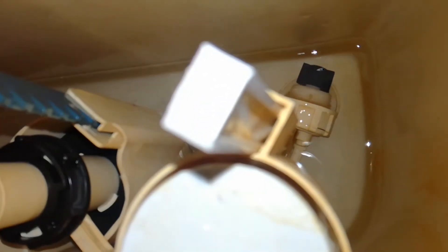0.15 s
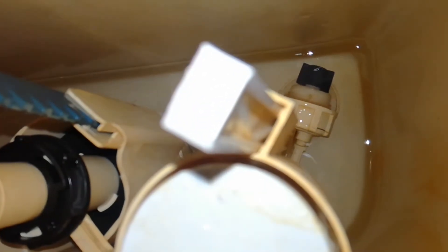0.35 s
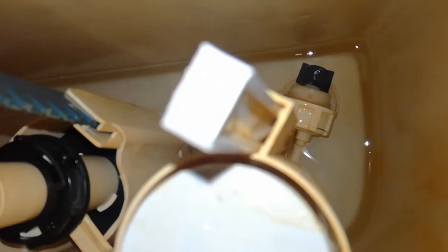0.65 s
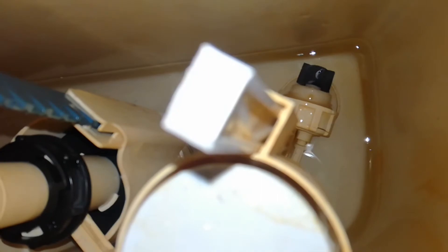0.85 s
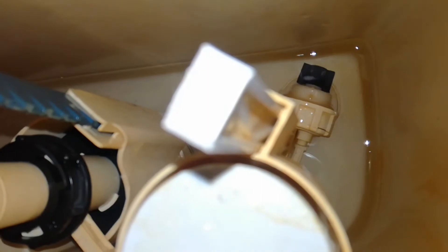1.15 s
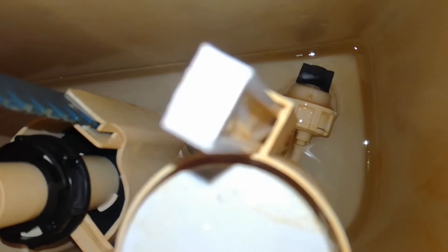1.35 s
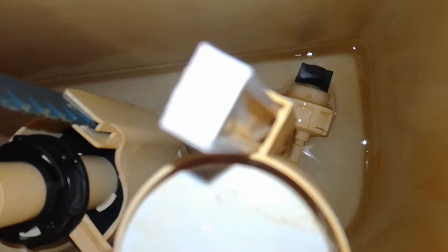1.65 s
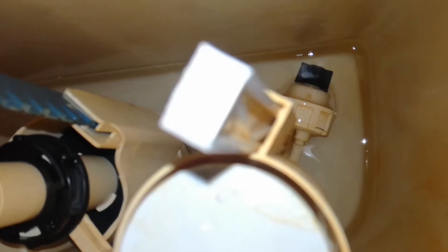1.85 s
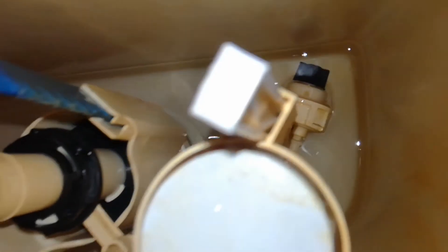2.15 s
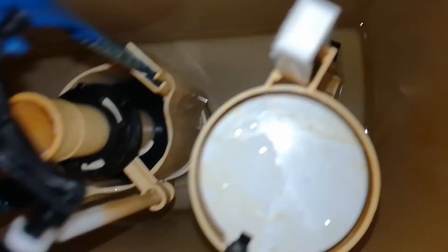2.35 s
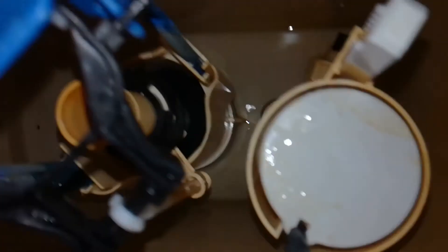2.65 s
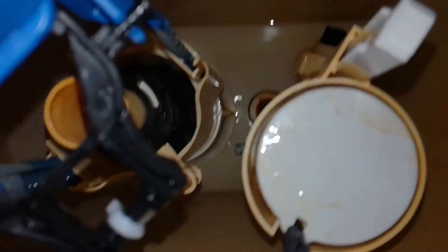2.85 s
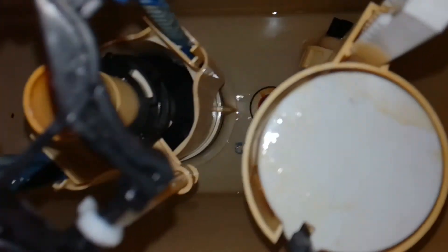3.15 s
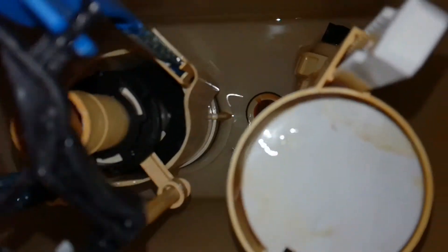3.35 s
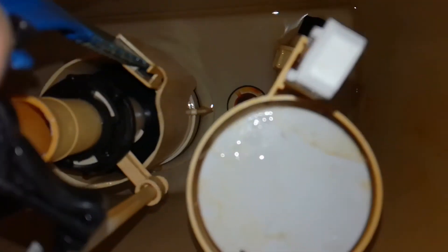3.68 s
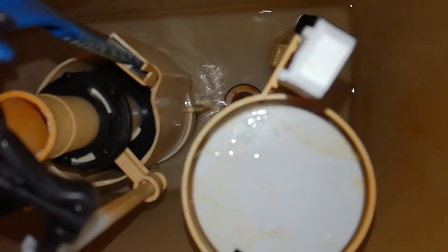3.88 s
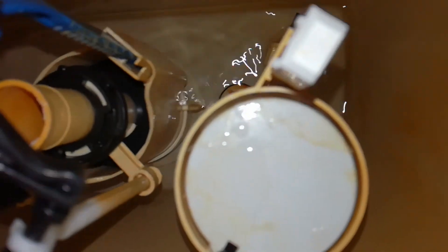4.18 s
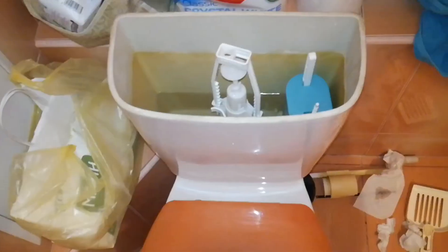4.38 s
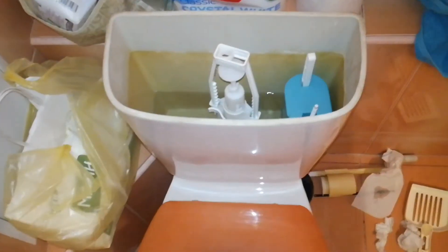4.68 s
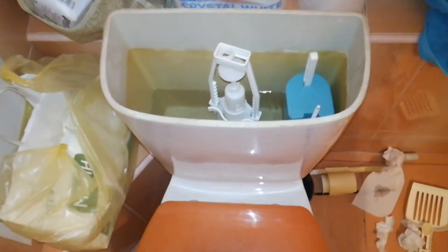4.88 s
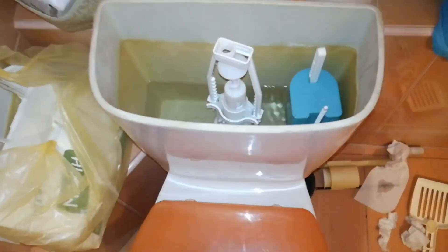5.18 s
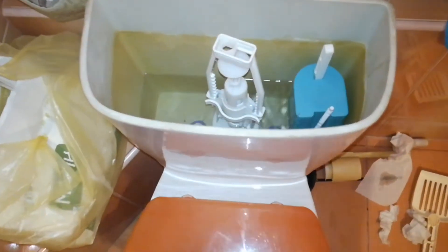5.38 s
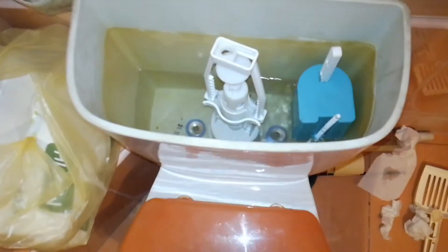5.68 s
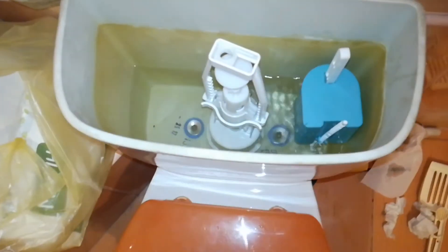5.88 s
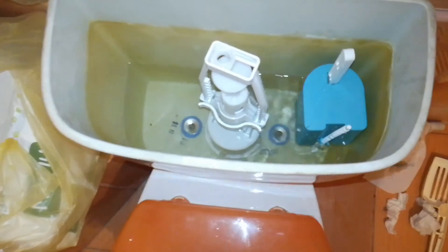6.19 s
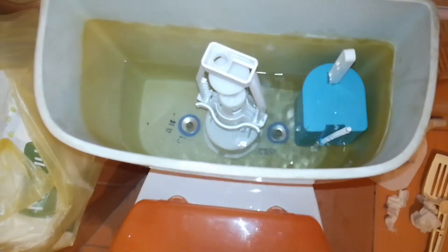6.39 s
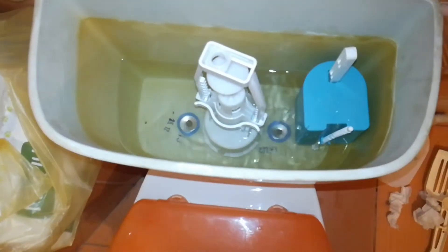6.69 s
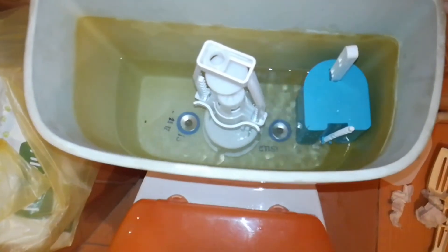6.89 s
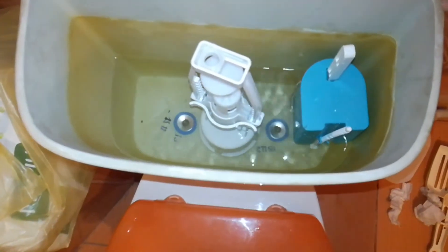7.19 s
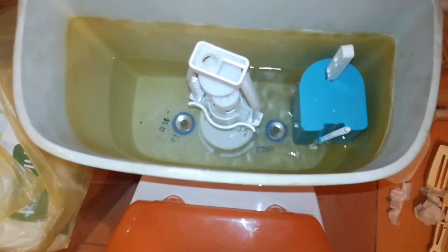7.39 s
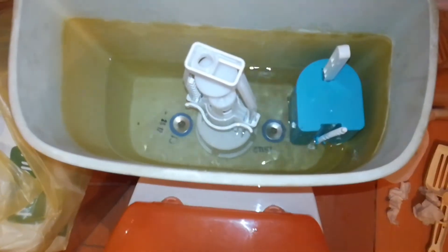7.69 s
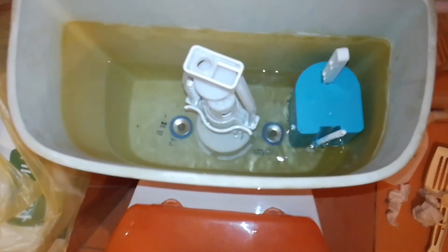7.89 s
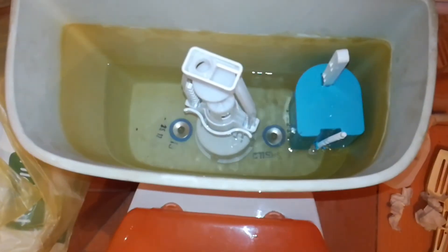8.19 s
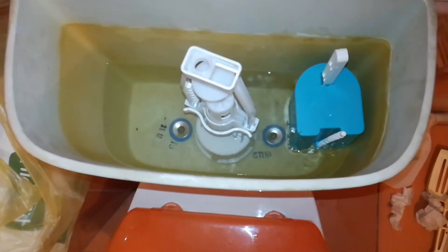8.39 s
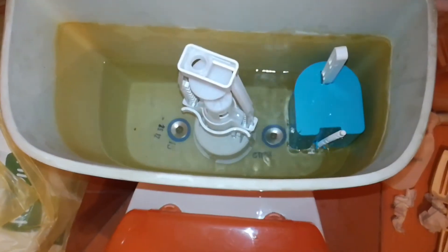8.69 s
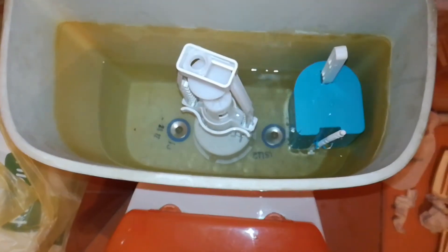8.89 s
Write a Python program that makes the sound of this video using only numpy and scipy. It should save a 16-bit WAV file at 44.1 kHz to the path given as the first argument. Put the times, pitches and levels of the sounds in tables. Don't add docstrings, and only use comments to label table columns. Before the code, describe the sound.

Faint trickles, bubbly plops and plastic clicks echo in a nearly empty toilet cistern, then a loud steady fill-valve hiss takes over.

```python
import sys
import numpy as np
from scipy import signal
from scipy.fft import rfft, irfft, next_fast_len
from scipy.io import wavfile
from scipy.ndimage import uniform_filter1d

SR = 44100
rng = np.random.default_rng(int(sys.argv[2]) if len(sys.argv) > 2 else 0)


def boost(x):
    u = np.asarray(x, float) / 20
    return 10 ** u


def transcribe(u):
    v = np.clip(np.atleast_2d(u).T, -1, 1)
    q = np.round(v * 32767).astype(np.int16)
    wavfile.write(sys.argv[1], SR, q)


N = 398663
SIZE = next_fast_len(N)
HZ = np.arange(SIZE // 2 + 1) * SR / SIZE + 1e-3
T = np.arange(N) / SR
FRAME = 8192
CUT_S, RESUME_S = 4.311, 4.3516


def shaped(x, gain):
    return irfft(rfft(x, SIZE) * gain, SIZE)[..., :N]


def unit(x):
    return x / np.sqrt(np.mean(x ** 2))


def curve(at, table):
    return np.interp(at, *np.transpose(table))


def peak(hz, width_hz, at=HZ):
    return 1 / (1 + (2 * (at - hz) / width_hz) ** 2)


def base(table, at=HZ):
    hz, *sides = np.transpose(table)
    return np.array([boost(np.interp(np.log(at + 1e-3), np.log(hz), db)) for db in sides])


def walk(rate_hz):
    hold = int(SR / rate_hz)
    steps = np.repeat(rng.standard_normal(N // hold + 1), hold)
    return unit(uniform_filter1d(uniform_filter1d(steps, hold), hold)[:N])


def ports(alike_hz, alike_high, lag):
    shared, *apart = rfft(rng.standard_normal((3, SIZE)))
    low = 1 / (1 + (HZ / alike_hz) ** 2)
    alike = low + (1 - low) * np.clip(alike_high, 0, 1) / (1 + (HZ / 9000) ** 2)
    late = low - (1 - low) * np.exp(-2j * np.pi * HZ * lag / SR)
    late /= np.abs(late) + 1e-9
    return np.sqrt(alike) * np.array([shared, shared * late]) + np.sqrt(1 - alike) * np.array(apart)


def walls(t60, db, size=SIZE):
    t = np.arange(FRAME) / SR
    tail = rng.standard_normal((2, FRAME)) * 1000. ** (-t / t60) * (t > .0008)
    tail *= boost(db) / np.sqrt(np.sum(tail ** 2, axis=1, keepdims=True))
    return 1 + rfft(tail, size) / (1 + (350 / np.linspace(1, SR / 2, size // 2 + 1)) ** 4)


def add(out, s, grain, db, pan_db):
    left_late = 33
    i = int(s * SR)
    left, right = grain / np.max(np.abs(grain)) * boost(db + np.array([[pan_db], [-pan_db]]) / 2)
    out[0, i + left_late:i + left_late + len(grain)] += left
    out[1, i:i + len(grain)] += right


# pitch_hz, width_hz, far_left, far_right, near_left,
# near_right (db per Hz)
FILLING_MODES = [(115.5, 7.9, -59, -59.5, -55.5, -55), (166.6, 11.45, -93, -79, -70.5, -71),
                 (313.7, 58, -95, -77, -88, -76.5), (369.5, 29.7, -120, -98, -82, -78.5),
                 (660, 47, -101, -110.0, -83, -77), (756.3, 78, -63, -66, -91, -67),
                 (840, 12.3, -54, -60, -69, -63), (995.1, 43, -75, -63, -56.5, -65),
                 (1030, 23, -51.5, -80, -109, -109.0), (1100.0, 38, -93.0, -59, -60, -103),
                 (1198, 81, -66, -78, -56.5, -59.5), (1328.7, 22, -50, -46, -62.5, -72),
                    (1526, 320, -58, -76, -61, -63.5), (1552, 42, -110.0, -77.5, -54.5, -51),
                    (2200, 76, -68.5, -56, -55.5, -53), (2522, 173, -60.5, -59, -58, -56.5),
                    (3200, 340, -53.5, -61.5, -58, -64.5), (3740, 120, -53.5, -74, -57, -84),
                    (4110, 200, -59, -72, -58, -63), (4309, 500, -53.5, -58.5, -56.5, -66),
                 (5330, 247, -59, -75.0, -54, -89), (5650, 1840, -110.0, -58.5, -110.0, -57.5),
                 (6457, 290, -105, -68, -54, -56.5), (6646, 418, -99.0, -54, -70.5, -53),
                 (7490, 145, -70, -64, -61.5, -58), (12770, 1750, -110.0, -78, -86, -77)]
# pitch_hz, left_db, right_db (per Hz)
JET_BASE = [(30.0, -88, -81), (70.0, -149, -80.5), (201, -87, -101.0), (506, -89, -85), (970, -86.5, -101),
            (1310, -90.5, -64), (1990, -65, -57), (2700, -65, -70), (5000.0, -56.5, -117), (6300, -57, -80),
            (6920, -58, -74), (6960, -65, -70.5), (7540, -66, -72), (8447, -68.5, -65),
            (10060, -82.5, -75.5), (13100, -88, -82.5), (15500.0, -137.0, -85)]
# time_s, nearness (0 far, 1 near)
PHONE_NEARNESS = [
    (4.35, 0.93),
    (5.2, 0),
    (5.8, 0.486),
    (6.3, 0.7),
    (6.6, 0.84),
    (7.2, 0.95),
    (8, 0.95),
    (9.04, 0.97),
]
WHISTLING = {5: (-22.5, -22.5, -40), 11: (-12, -17, -22), 13: (-19, -9.5, -7.5)}
# pitch_hz, time_s, half_length_s, left_db, right_db
# (per Hz)
WATER_GLINTS = [(3255, 5.38, 0.36, -49, -64), (4250, 5.7, 0.41, -52, -70), (4440, 5.7, 0.49, -49, -70),
                (5080, 5.35, 0.306, -49.5, -59), (6710, 4.44, 0.31, -51, -62), (6200, 4.6, .3, -53, -70),
                (6400, 9.07, 0.68, -54, -63.5), (6560, 7.2, 0.63, -62, -50), (4280, 8.87, 0.666, -48, -64),
                (4680, 9, .6, -49, -66), (5400, 7.09, 0.57, -58, -57), (6040, 8.3, .9, -54.5, -64),
                (5600, 8.9, .4, -53.5, -67), (2550, 6.05, 0.444, -53.5, -54),
                (2390, 8.6, 1.3, -54.5, -52.5), (2352, 6.78, 0.96, -51.5, -63), (1776, 5.9, 2.1, -63, -67),
                (5380, 5, .5, -59.5, -66), (5110, 6.57, 0.44, -64, -53.5), (7780, 9.43, .6, -64, -57.5),
                (2770, 4.7, 0.61, -68, -63), (3800, 5.2, 0.57, -55, -63), (6100, 6.1, 0.49, -62, -61.5),
                (1500, 6, 0.32, -52, -64), (1450, 4.7, 0.47, -66, -52), (3640, 7.6, 1.1, -67, -70),
                (5250, 6.1, .5, -63, -54), (6640, 6.2, 0.54, -59.5, -49.5), (6900, 6.97, 0.68, -62, -52),
                (5400, 6.7, 0.75, -67, -58), (7320, 5.8, 0.37, -69, -56), (7498, 8.5, 1.4, -72, -59),
                (1970, 8.1, 0.56, -74, -54.5), (3345, 5.83, .6, -64.5, -57), (5180, 8.06, 0.69, -63, -58),
                (7630, 6.3, .8, -64, -62), (1865, 5.15, 0.52, -54, -54), (2560, 4.6, 0.58, -55.5, -62.5),
                (3144, 6.83, 0.65, -54, -64), (6400, 7.4, .6, -66, -56),
                (1278, 5.94, 0.62, -56, -52), (1580, 7.1, .65, -52, -49), (368.3, 8.76, 0.37, -73, -70),
                 (251, 7.5, 0.38, -74.5, -73), (395, 7.29, .35, -76, -76), (660, 7.28, 0.64, -71.5, -70)]
# time_s, level_db
JET_FLOW = [(4.6, -21.5), (5.1, -20.5), (5.6, -20.5), (6.6, -20.5), (7.8, -21), (9.04, -21.5)]


def fill_valve():
    jet_db, jump_s, jump_length_s = -21.5, 6.4, 0.064
    fade_in_s, fade_start = 0.28, 0.045
    noise = irfft(ports(230, .7, lag=21), SIZE)
    hz, s, jet = signal.stft(noise, SR, nperseg=FRAME, noverlap=6144)
    near = np.clip(curve(s, PHONE_NEARNESS), 0, 1)
    shapes, shares = [], []
    for k, (centre, width, *sides) in enumerate(FILLING_MODES):
        far, close = boost(2 * np.reshape(sides, (2, 2, 1)))
        share = far * (1 - near) + close * near
        if k in WHISTLING:
            width *= .9
            db = jet_db + np.interp(s, [jump_s, jump_s + jump_length_s, N / SR], WHISTLING[k])
            share *= boost(2 * db) / (np.pi / 4 * width * np.mean(share, axis=0))
        breath = uniform_filter1d(rng.standard_normal(len(s)), size=12)
        breath = unit(uniform_filter1d(breath, size=12))
        shapes.append(peak(centre, width, hz) ** 2)
        shares.append(share * boost(0.41 * breath * (k not in WHISTLING)))
    for centre, when, length, *sides in WATER_GLINTS:
        shapes.append(peak(centre, 20 + 0.03 * centre, hz) ** 2)
        shares.append(boost(2 * np.array(sides))[:, None] * np.exp(-((s - when) / length) ** 2))
    shapes, shares = np.transpose(shapes), np.transpose(shares, (1, 0, 2))
    power = base(JET_BASE, hz)[:, :, None] ** 2 + shapes @ shares

    combs = np.array([walls(t60=.13, db=-6, size=FRAME) - 1 for _ in range(11)])
    weights = np.cos(np.pi / 2 * np.clip((s - 4.4) / .47 - np.arange(11)[:, None], -1, 1))
    echoes = np.transpose(combs, (1, 2, 0)) @ weights
    sung = list(WHISTLING)
    broad = 1 - shapes[:, sung] @ shares[:, sung] / power
    jet *= (1 + echoes * broad) * np.sqrt(power)

    out = signal.istft(jet, SR, nperseg=FRAME, noverlap=6144)[1][:, :N]
    out /= np.sqrt(uniform_filter1d(np.mean(out, axis=0) ** 2, SR // 2))
    fade = np.clip(fade_start + (T - RESUME_S) / fade_in_s, 0, 1)
    return out * fade * boost(curve(T, JET_FLOW) + 0.32 * walk(40))


# pitch_hz, width_hz, left_db, right_db (per Hz)
DRAINED_AIR_MODES = [(244, 31, -74.5, -73), (470, 140, -102.5, -110.0), (523, 160, -105, -100),
                     (650, 39.5, -85, -91), (730, 22, -78.5, -81.5), (1030, 228, -110.0, -88.5),
                     (1328, 38, -83, -87), (1500, 71, -98, -110.0), (2120, 200, -112, -86.5),
                     (2120.0, 680, -92, -110.0), (2410, 120, -99.5, -98.5), (2660, 40, -102.5, -85.5),
                     (3110, 140, -89.5, -98.5), (3470, 114, -101, -89.5), (4800, 1400, -99, -104.0),
                     (6400, 2200, -99.0, -99.0), (8350, 2000, -110.0, -106.0), (930, 38, -90, -88),
                     (180.7, 25, -85, -85)]
# pitch_hz, left_db, right_db (per Hz)
TRICKLE_BASE = [(30.0, -83.5, -80), (70.0, -72.5, -75.5), (192, -82.5, -79.5), (470, -108.0, -104),
                (944, -91, -97), (1800.0, -99.0, -90.5), (3500.0, -94, -105), (6000, -95, -101.0),
                (8250, -107.0, -107.0), (12500, -112.0, -109.0), (15500.0, -114.0, -113.0)]


def trickle():
    power = base(TRICKLE_BASE) ** 2
    for hz, width, *sides in DRAINED_AIR_MODES:
        power = power + (boost(np.array(sides))[:, None] * peak(hz, width)) ** 2
    water = ports(214, 0.042, lag=32.0) * np.sqrt(power)
    # edges_hz, trim_db, size of the drips over the steady run
    registers = [((15, 160), 1.5, .3),
                 ((160, 360), 1.2, .15),
                 ((360, 580, 850, 1150, 1500, 1900, 2350, 2800, 3350), -1.2, .8),
                 ((3230, 4300, 5560, 8300), 1.4, .3),
                 ((8200, 11000, 30000), 1.6, .3),
                 ((320, 440, 620), 0.1, .5)]
    out = 0
    for gain, (edges, trim_db, size) in zip(causes(), registers):
        above = [1 / (1 + (edge / HZ) ** 12) for edge in edges]
        register = 0
        for a, b in zip(above, above[1:]):
            band = irfft(water * np.sqrt(np.abs(a - b)), SIZE)[:, :N]
            register = register + band * drips(9.3, size) * boost(2.4 * walk(18))
        out = out + unit(register) * gain * boost(trim_db)
    return out


def drips(rate_hz, size):
    hits = (rng.random(N) < rate_hz / SR) * np.minimum(rng.exponential(size, N), 2 * size) / 60
    attacks = uniform_filter1d(hits, size=60) * 60
    return 1 + signal.lfilter([1], [1, -np.exp(-1 / (0.064 * SR))], attacks)


def swells(table):
    s, db, rise, fall = np.transpose(table)[:, :, None]
    late = T[::64] - s
    power = boost(2 * db - 40 * np.maximum(late / fall, -late / rise))
    return np.interp(T, T[::64], np.sum(power, axis=0))


# time_s, boom_db
OUTFLOW = [(0, -58.5), (.2, -52), (.7, -57), (.96, -49), (1.27, -59.5), (1.75, -57.5), (2.02, -53),
           (2.35, -54), (2.63, -51), (2.78, -61), (3.1, -63), (3.83, -60.5), (4.3, -69)]
# time_s, rumble_db, rise_s, fall_s (both over 20 dB)
HAND_SHIFTS = [
    (0, -49.5, .01, .2),
    (.8, -59.5, 0.26, 0.32),
    (1.36, -56, .1, .12),
    (2.02, -57.5, .8, 0.73),
    (2.63, -59.5, 0.54, .5),
    (2.81, -48.5, 0.059, .15),
    (2.935, -46, .04, .4),
    (3.18, -52, 0.088, .15),
    (3.39, -43.5, 0.24, 0.32),
    (4.12, -64, 0.44, .15),
]
# time_s, hiss_db, rise_s, fall_s (both over 20 dB)
FLOOR_SPLASHES = [(0, -54.5, .01, 0.256), (.13, -51, 0.015, 0.16), (.28, -57, 0.045, 0.71),
                  (.61, -55, .01, 0.12), (.712, -55, 0.0092, 0.61), (.87, -46, 0.26, 0.32),
                  (1.2, -50.5, 0.053, 0.44), (1.3, -53.5, 0.33, 0.16), (1.55, -59.5, 0.091, 0.93),
                  (1.99, -58, .03, .12), (2.22, -54, 0.095, 0.27), (2.41, -47, 0.022, 0.22),
                  (2.79, -49, 0.03, 0.0365), (2.98, -65, 0.19, 0.19), (3.42, -50, 0.0024, 0.016),
                  (3.5, -57.5, 0.11, .25), (3.7, -59, 0.09, 0.046), (4.065, -60.5, 0.0089, 0.094),
                  (4.13, -57.5, 0.018, 0.158), (4.28, -60, .01, 0.22)]
# time_s, level_db
SEEPING = [
    (0, -68),
    (2.3, -61),
    (2.9, -65.5),
    (4.3, -75),
]


def causes():
    still_db, boom_in_handling_db = -66, -13
    scuff_db = -11
    trickle_db, trickle_per_boom, trickle_in_splash_db = -56, 0.43, -2
    spray_db, spray_per_splash, spray_full_db = -69.5, 2.2, -56.5
    run_db, hand, wet = curve(T, OUTFLOW), swells(HAND_SHIFTS), swells(FLOOR_SPLASHES)
    rumble = np.sqrt(hand + boost(2 * still_db))
    boom = np.sqrt(boost(2 * run_db) + hand * boost(2 * boom_in_handling_db))
    hand_slow = uniform_filter1d(hand, size=9000)
    wet_slow = uniform_filter1d(wet, size=6000)
    steady = boost(trickle_db + trickle_per_boom * (run_db + 58.0))
    trickling = np.sqrt(steady ** 2 + hand_slow * boost(2 * scuff_db)
                        + wet_slow * boost(2 * trickle_in_splash_db))
    splash = np.sqrt(wet + boost(2 * curve(T, SEEPING)))
    spray = boost(spray_db) * (splash / boost(-56.5)) ** spray_per_splash
    spray = spray / np.hypot(1, spray / boost(spray_full_db))
    return rumble, boom, trickling, splash, spray, np.sqrt(hand_slow) * boost(scuff_db)


# start_s, peak_db, centre_hz, left_minus_right_db
SPATTER = [(0.5506, -55, 4770, 5), (0.609, -50.5, 5820, 1), (0.709, -48, 6400, -2.5), (1.195, -48, 6420, 3),
           (1.5367, -49, 3550, 5), (1.986, -52, 4560, 4), (2.208, -42.5, 5400, 0.5),
           (2.7313, -49.5, 3510, 2.5), (4.28, -49.5, 5000, 3), (.125, -56, 3700, 0), (.18, -54, 6500, 0),
           (.265, -55, 8880, -1.5), (.375, -60, 7500, 0), (2.159, -54.5, 7000, 0), (2.415, -52, 6500, 0),
           (2.465, -57, 12500, -8.5), (2.515, -61.5, 12500, -5), (2.52, -54, 5000, 4.5),
           (2.575, -53, 5470, 5), (2.91, -63, 6100, 3), (2.95, -65.5, 12300, -6.5), (2.96, -57, 4880, 3.5),
           (3.09, -66, 8000, 0), (3.5, -60, 7000, -3.5), (4.068, -61, 6100, -6.5),
           (4.128, -60, 12800, -8.5), (4.13, -58.5, 4870, 0), (4.278, -66, 11800, -6.5)]


def drops():
    out, t = np.zeros((2, N)), np.arange(int(.2 * SR)) / SR

    def narrow_noise(low_hz, high_hz):
        narrow = signal.butter(2, [low_hz, high_hz], "band", fs=SR, output="sos")
        return signal.sosfilt(narrow, rng.standard_normal(len(t)))

    for s, db, hz, t60, pan_db in bubbles() + patter(count=320):
        fade = 1000. ** (-t / t60) * np.cos(np.pi / 2 * t / t[-1]) * (1 - np.exp(-t * hz / 0.21))
        bubble = np.sin(2 * np.pi * hz * t * (1 + 0.198 * rng.random() * t))
        rough = 1.03 * unit(narrow_noise(hz / 1.133, hz * 1.14))
        add(out, s, (bubble + rough) * fade, db, pan_db)
    for s, db, hz, pan_db in SPATTER:
        burst = np.exp(-t / 0.0172) * (1 - np.exp(-t / 0.0017))
        add(out, s, narrow_noise(hz / 1.12, hz * 1.111) * burst, db + 8.5, pan_db)
    ring = 0
    for hz, width, *sides in DRAINED_AIR_MODES:
        ring = ring + boost(np.array(sides) + 84)[:, None] / (1 + 2j * (HZ - hz) / (0.404 * width))
    return shaped(out, walls(t60=0.065, db=-1.5) + ring) * boost(-1.5)


# start_s, peak_db, pitch_hz
PLOP_BUBBLES = [(.096, -44.5, 813), (.13, -42, 641), (.18, -38.5, 777), (.066, -50, 1030), (.3, -42, 715),
                (.53, -51, 900), (.609, -48, 934), (.632, -50, 730), (.82, -47, 737), (.975, -47, 734),
                (1.05, -51, 646), (1.13, -40.5, 764), (1.2, -48, 740), (1.476, -44, 701),
                (1.506, -44.5, 708), (1.73, -45.5, 730), (1.78, -43.5, 730), (2.231, -35, 739),
                (2.5, -51, 1020), (2.579, -45, 740), (2.69, -48, 660), (3.2, -50, 1020), (3.665, -45, 697),
                (3.77, -46.5, 717), (3.98, -54, 1094), (4.275, -48, 1054), (.891, -43, 730),
                (1.113, -39, 658), (1.536, -42, 995), (1.606, -49, 920), (1.843, -48, 930),
                (1.986, -46, 644), (2.043, -36.5, 660), (2.127, -41, 730), (2.206, -36, 730),
                (2.362, -42, 985), (2.868, -43, 1015), (2.98, -48.5, 730), (3.024, -43, 1030),
                (3.459, -34.5, 728), (3.747, -52, 670), (3.89, -45.5, 1030)]
# pitch_hz, left_minus_right_db
PLOP_SIDES = [(780, 6.5), (950, -2)]
# start_s, peak_db, pitch_hz
SMALL_BUBBLES = [(0.2387, -38.5, 2150), (.262, -37.5, 2060), (.283, -41, 2150), (.4085, -38, 2140),
                 (0.5415, -45, 2170), (.7073, -45, 2146), (.403, -45, 1500), (1.061, -43, 1440),
                 (1.666, -54, 2170), (1.107, -38.5, 2638), (1.525, -41.5, 2700), (1.7166, -44.5, 2660),
                 (1.848, -45, 2240), (1.9877, -40, 2600), (2.2094, -34.5, 2100), (2.39, -36, 2050),
                 (2.322, -41.5, 1510), (2.407, -40, 2450), (2.3, -42, 1738), (2.421, -43, 1630),
                 (2.47, -41, 1800), (3.5, -49, 2320), (3.89, -49.5, 1320), (4.172, -51, 2130),
                 (4.285, -52, 1300), (2.579, -40.5, 2472), (2.6418, -42, 2410), (3.0545, -48, 2120),
                 (3.138, -48, 2390), (3.178, -46.5, 2275), (3.3832, -39.5, 1517), (3.466, -43.5, 1450),
                 (3.6626, -45, 2064), (3.6931, -41, 2069), (3.9629, -51, 2160), (4.12, -46, 2200),
                 (4.281, -46, 3110)]
# time_s, left_minus_right_db
SMALL_SIDES = [(.3, -3), (1.6, 1), (2.0, 5.5), (2.6, -2.5), (3.1, -12)]
# start_s, peak_db, pitch_hz, t60_s, left_minus_right_db
ODD_DRIPS = [(.272, -37, 687, 0.326, 7), (1.457, -48.5, 729, 0.35, 7), (2.43, -46, 505.6, 0.42, 3),
             (2.54, -48, 470, 0.36, -3), (3.419, -33, 4850, .016, 5), (3.4186, -30, 5740, .014, 0),
             (2.7849, -31.5, 1100, 0.0252, 12.5), (2.788, -34, 1750, 0.029, 6),
             (3.614, -45, 713.3, 0.43, 12), (3.679, -50, 1328, 0.22, -3), (3.96, -50, 727, .2, 11),
             (4.085, -54, 1400, 0.14, 6), (4.19, -47.5, 816, 0.19, 0)]


def bubbles():
    plop_t60_s, small_t60_s = 0.096, 0.11
    plops = [(s, db, hz, plop_t60_s, curve(hz, PLOP_SIDES)) for s, db, hz in PLOP_BUBBLES]
    small = [(s, db, hz, small_t60_s, curve(s, SMALL_SIDES)) for s, db, hz in SMALL_BUBBLES]
    return plops + small + ODD_DRIPS


def patter(count):
    level_db, spread_db, t60_s = -55, 2.5, 0.0357
    modes = np.array(DRAINED_AIR_MODES)[3:12]
    when, which = rng.random((count, 2)).T
    size, tune = rng.standard_normal((count, 2)).T
    hz, _, left, right = modes[(which * len(modes)).astype(int)].T
    pan_db = np.clip(left - right, -10, 10)
    return list(zip(when * CUT_S, level_db + spread_db * size, hz * (1 + 0.061 * tune),
                    t60_s + 0 * hz, pan_db))


# start_s, length_s, peak_db, pitch_hz
OUTLET_GULPS = [(.127, 0.057, -41.5, 189), (0.157, 0.058, -42, 229), (0.272, 0.079, -42.5, 242.2),
                (.365, .055, -44.5, 244), (0.829, .06, -46, 244), (0.928, 0.11, -34.5, 245),
                (1.11, 0.104, -40.5, 244), (1.457, 0.14, -39.5, 243.5), (2.003, 0.135, -45, 237),
                (2.21, 0.061, -47, 240), (2.359, 0.084, -49, 237), (2.45, 0.0795, -38, 228.4),
                (2.918, .04, -44, 175), (2.999, 0.107, -47, 239.5), (3.363, 0.042, -42, 170.6),
                (3.455, 0.082, -38.5, 239), (2.802, 0.047, -46, 242), (3.61, 0.052, -47, 225),
                (3.677, 0.045, -51, 220), (4.271, 0.038, -52, 266.5)]


def gulps():
    sag, settle_s, roundness = 0.126, 0.01, .6
    out = np.zeros((2, N))
    for (s, length, db, hz), wobble in zip(OUTLET_GULPS, rng.random((len(OUTLET_GULPS), 2))):
        t = np.arange(int(length * SR)) / SR
        phase = 2 * np.pi * np.cumsum(hz * (1 - sag * np.exp(-t / settle_s))) / SR
        flutter = 1 + 0.28 * np.sin(2 * np.pi * (wobble[0] + (15 + 15 * wobble[1]) * t))
        swell = np.sin(np.pi * t / length) ** roundness * flutter
        add(out, s, np.sin(phase) * swell, db, 1)
    return out


# start_s, peak_db, centre_hz, t60_s, left_minus_right_db
PLASTIC_CLICKS = [
    (2.207, -31.5, 3000, 0.045, 2),
    (2.305, -54, 4000, .01, 0.5),
    (2.323, -35.5, 4000, 0.0092, -8.5),
    (2.389, -24.5, 2500, 0.0057, -2),
    (2.7661, -29, 2800, 0.0115, 9.5),
    (2.7848, -21, 2900, 0.0082, 9),
    (2.7888, -20.5, 3000, 0.012, -4.5),
    (2.795, -34, 1300, 0.05, -10),
    (2.803, -41.5, 1600, .02, -3),
    (3.4188, -33, 3200, 0.015, 6),
]


def clicks():
    out, t = np.zeros((2, N)), np.arange(int(.08 * SR)) / SR
    for s, db, hz, t60, pan_db in PLASTIC_CLICKS:
        band = signal.butter(3, [hz / 19.3, hz * 1.7], "band", fs=SR)
        crack = signal.lfilter(*band, rng.standard_normal(len(t)))
        add(out, s, crack * 1000. ** (-t / t60), db, pan_db)
    return shaped(out, walls(t60=.04, db=-8))


def microphone_hiss():
    hiss_db = -65.5
    return shaped(rng.standard_normal((2, N)), boost(hiss_db) / (1 + (HZ / 13000) ** 2))


def scene():
    drained = trickle() + drops() + gulps() + clicks() + microphone_hiss()
    return drained * (T < CUT_S) + fill_valve() * (T > RESUME_S)


def roll_off(x):
    return signal.sosfilt(signal.butter(12, 15870, fs=SR, output="sos"), x)


def record(dry):
    top_hz = 15880
    mid, side = (dry[0] + dry[1]) / 2, (dry[0] - dry[1]) / 2
    side = signal.sosfilt(signal.butter(1, 220, "high", fs=SR, output="sos"), side)
    return roll_off(shaped(np.array([mid + side, mid - side]), HZ < top_hz))


dry = scene()
out = record(dry)
transcribe(out)
```